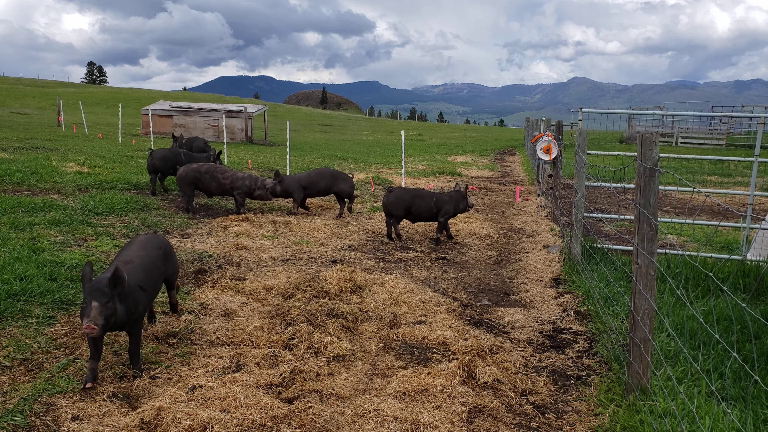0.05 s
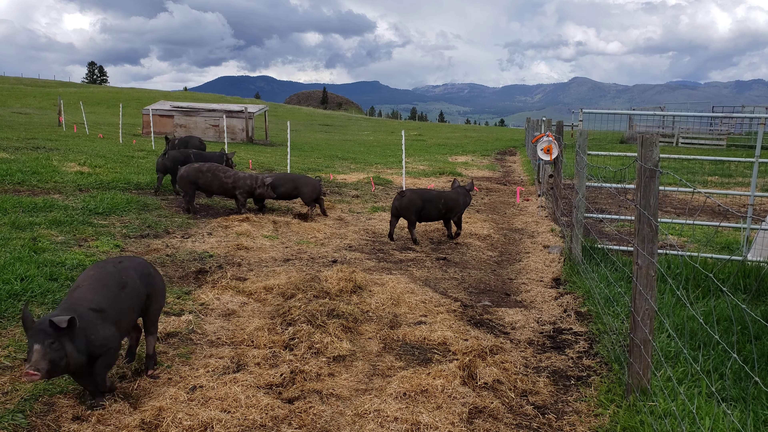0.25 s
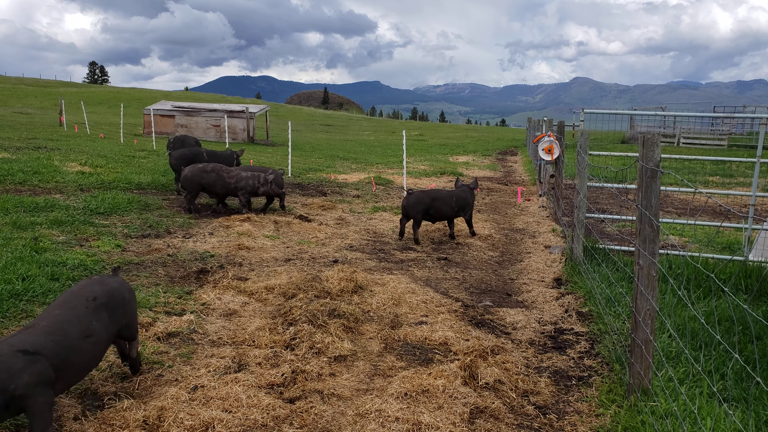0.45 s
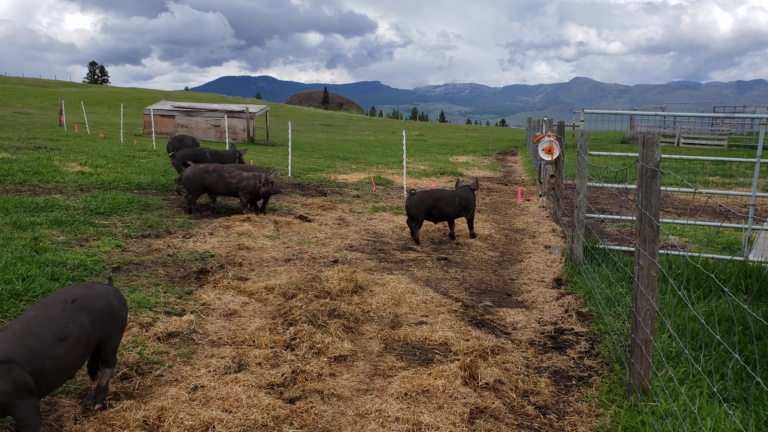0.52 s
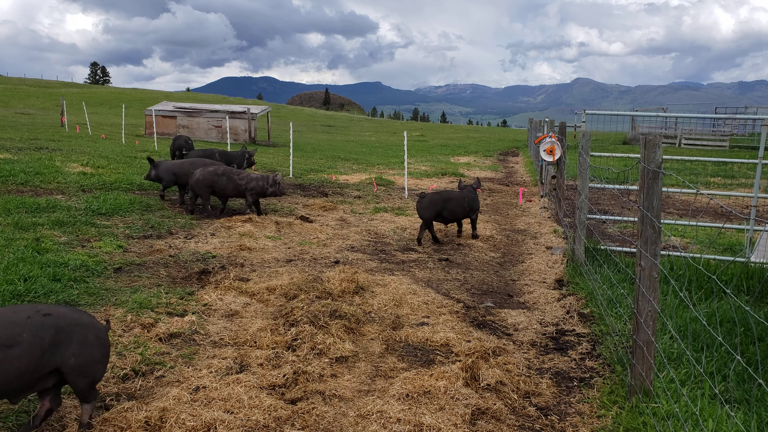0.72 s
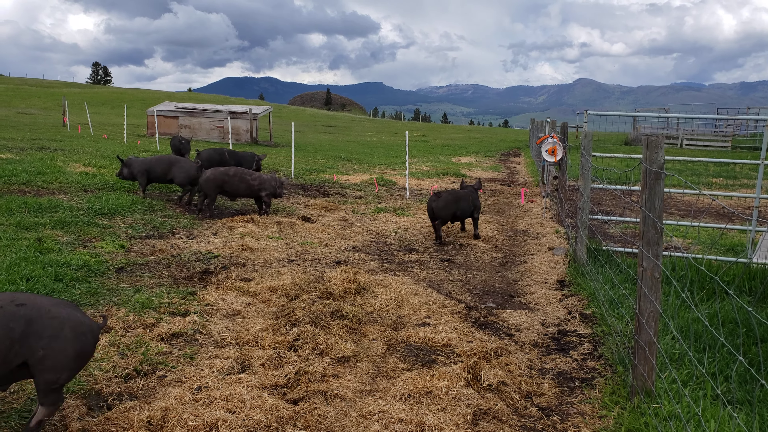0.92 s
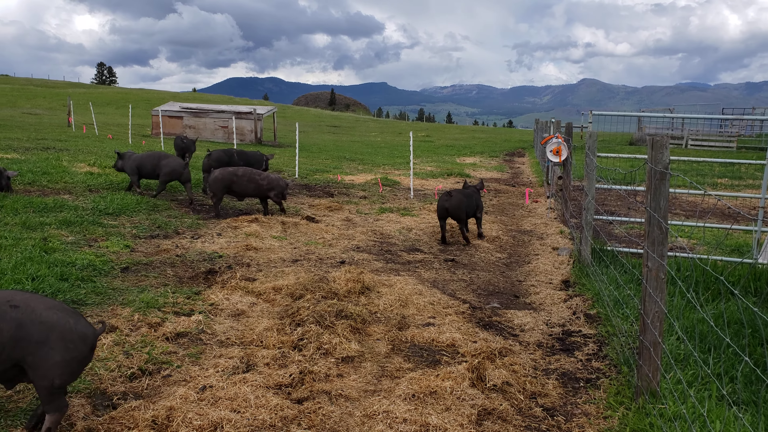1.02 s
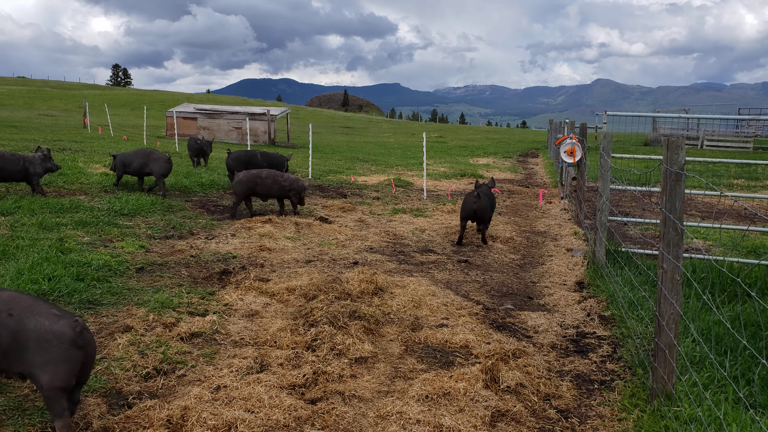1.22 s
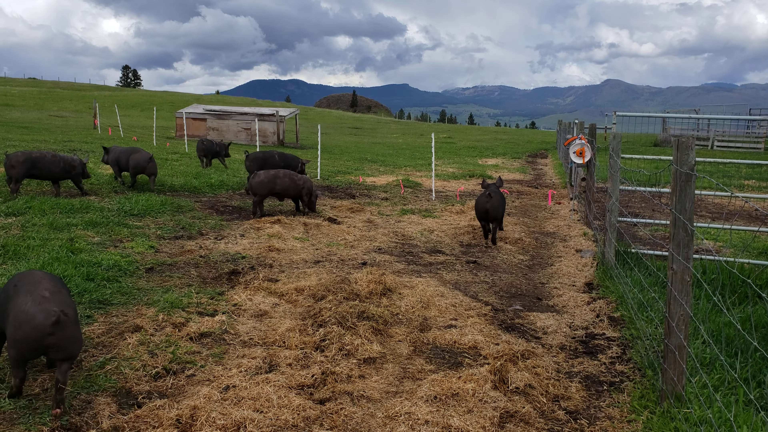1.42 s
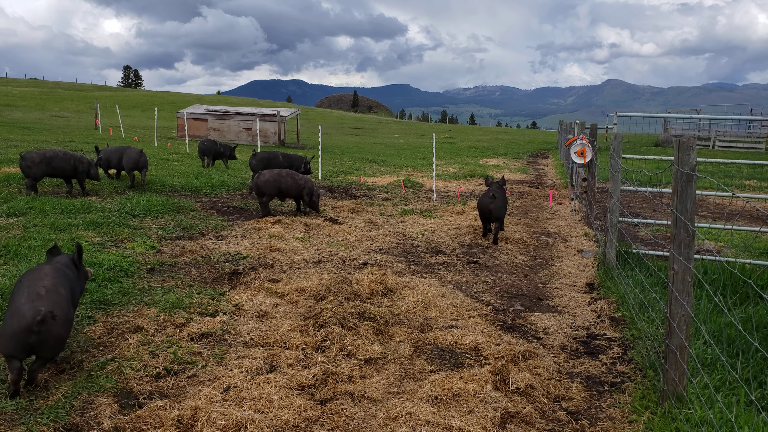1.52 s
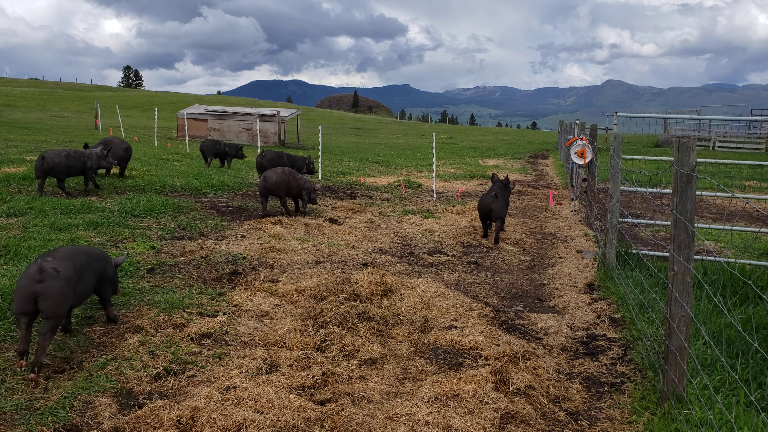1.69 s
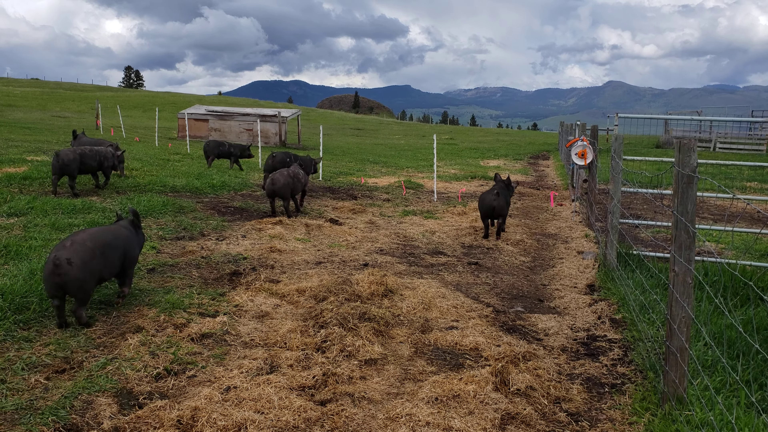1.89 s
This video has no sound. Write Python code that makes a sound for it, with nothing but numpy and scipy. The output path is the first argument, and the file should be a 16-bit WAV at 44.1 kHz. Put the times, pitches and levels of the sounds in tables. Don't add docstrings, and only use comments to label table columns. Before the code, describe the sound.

Wind rumble, in separate bursts left and right, dominates the first second outdoors; beneath it pigs brush quietly through dry straw, with small snaps, faint soil footfalls, a very distant engine hum and light hiss.

```python
import sys
import numpy as np
from scipy import signal
from scipy.fft import rfft, irfft, next_fast_len
from scipy.io import wavfile

SR = 44100
rng = np.random.default_rng(int(sys.argv[2]) if len(sys.argv) > 2 else 0)


def gain_from_db(level_db):
    decades = np.asarray(level_db, float) / 20
    return 10 ** decades


def persist_wave(psi):
    counts = np.round(np.clip(psi, -1, 1) * 32767).astype(np.int16)
    wavfile.write(sys.argv[1], SR, np.atleast_2d(counts).T)


N = 85995


def colour(x, points, lag_s=0):
    size = next_fast_len(N + 4096)
    hz = np.arange(size // 2 + 1) * SR / size + 1e-3
    corner_hz, corner_db = np.array(points).T
    gain = gain_from_db(np.interp(np.log(hz), np.log(corner_hz), corner_db))
    delay = np.exp(-2j * np.pi * hz * lag_s)
    return irfft(rfft(x, size) * gain * delay, size)[..., :N]


def rms_one(x):
    return x / np.sqrt(np.mean(x ** 2) + 1e-20)


def band(x, low_hz, high_hz):
    edges_hz = [low_hz, min(high_hz, 0.48 * SR)]
    return signal.sosfilt(signal.butter(2, edges_hz, "band", fs=SR, output="sos"), x)


def drift(rate):
    step = 40
    pole = np.exp(-2 * step * np.pi * rate / SR)
    noise = rng.standard_normal(N // step + 2002)
    slow = signal.lfilter([1], [1, -2 * pole, pole * pole], noise)[2000:]
    return np.interp(np.arange(N) / step, np.arange(len(slow)), rms_one(slow))


def bump(s, db, length, tail=0.66):
    t = np.arange(N) / SR - s
    width = length * np.where(t > 0, tail, 1)
    return gain_from_db(db) * 2.0 ** (-(2 * t / width) ** 2)


# time in seconds, rms level in dB, length in seconds, beat frequency in Hz.
LEFT_EDDIES = [(.03, -49.5, 0.037, 58.2), (.134, -51.5, 0.041, 62.5), (.267, -36, 0.029, 80.3),
               (.33, -34, 0.033, 89.7), (.36, -30.5, 0.025, 55.2), (.395, -40.5, 0.014, 75),
               (.4225, -21, 0.01, 161), (.411, -30, 0.02, 70), (.445, -18.5, 0.025, 61.5),
               (.4605, -26.5, 0.012, 78.4), (.4695, -32.5, 0.0075, 150), (.4825, -23, 0.0213, 60),
               (.55, -37, 0.061, 64.6), (.6, -45, 0.097, 55.1), (.745, -41, 0.029, 67.4),
               (.845, -32.5, 0.023, 57.5), (.89, -45, 0.16, 64.9), (.952, -35, 0.016, 57),
               (1.034, -49.5, 0.03, 67), (1.835, -38, 0.025, 62), (1.919, -51, 0.021, 109)]
RIGHT_EDDIES = [(.027, -35.5, 0.021, 74), (.106, -45, 0.066, 59.4), (.209, -26, 0.015, 72.3),
                (.26, -44, 0.14, 62.6), (.35, -53, 0.059, 57.5), (.45, -36, 0.047, 88),
                (.478, -29.5, 0.0195, 78), (.54, -49.5, 0.064, 55), (.635, -48, 0.078, 55),
                (.673, -31.5, 0.046, 88), (.739, -38.5, 0.041, 74), (.793, -37.5, 0.018, 61.4),
                (.868, -42, 0.012, 60), (1.022, -47, 0.046, 80), (1.07, -44.5, 0.055, 61.7),
                (1.69, -38, 0.025, 89.7), (1.702, -40.5, 0.0087, 115), (1.726, -42.5, 0.022, 75),
                (1.769, -41, 0.016, 70), (1.7815, -34.5, 0.014, 105), (1.803, -39, 0.012, 81),
                (1.814, -41.5, 0.012, 100), (1.826, -42.5, .012, 79), (1.886, -55.5, 0.12, 77.3)]
# frequency in Hz, gain in dB.
TURBULENCE = [(20, -34), (35, -9), (55, -2), (100, -8), (170, -19), (300, -30), (500, -43), (900, -69)]
EDDY_WOBBLE_RAD, EDDY_SHARPNESS = 1, 1.21
SHARP_REF_HZ, SHARP_BY_PITCH, SHARP_BY_LEVEL = 70, 0.36, 0.13
FIZZ_DB, FIZZ_DB_PER_OCTAVE = -9.5, 8.5
BREEZE_DB, BREEZE_LUMPS_DB, GUST_LUMPS_DB = -64, 8, 4


def wind(eddies):
    t, wobble = np.arange(N) / SR, drift(19.9)
    beats, fizz_power = 0, 0
    for s, db, length, hz in eddies:
        phase = 2 * np.pi * hz * (t - s) + EDDY_WOBBLE_RAD * (wobble - wobble[int(s * SR)])
        sharpness = EDDY_SHARPNESS * (hz / SHARP_REF_HZ) ** SHARP_BY_PITCH
        sharpness = sharpness * gain_from_db(SHARP_BY_LEVEL * (db + 32.5))
        shape = np.exp(sharpness * np.cos(phase))
        beats = beats - bump(s, db, length, tail=1.0) * (shape - shape.mean()) / shape.std()
        octaves = min(np.log2(hz / SHARP_REF_HZ), 0.4)
        fizz_db = db + FIZZ_DB + FIZZ_DB_PER_OCTAVE * octaves
        fizz_power = fizz_power + bump(s, fizz_db, 1.5 * length) ** 2
    rough = rms_one(colour(rng.standard_normal(N), TURBULENCE))
    lumps = np.minimum(drift(14.7), 1)
    gust_power = fizz_power * gain_from_db(GUST_LUMPS_DB * lumps) ** 2
    breeze_power = gain_from_db(BREEZE_DB + BREEZE_LUMPS_DB * lumps) ** 2
    thumps = colour(beats, [(22, -29.5), (52, 3.0), (260, -2), (900, -36.5)])
    return thumps + np.sqrt(gust_power + breeze_power) * rough


GRAINS_PER_S, GRAIN_SPREAD_DB = 9000, 1.5


def grains():
    spread_db = GRAIN_SPREAD_DB * np.minimum(rng.exponential(1, (2, N)), 5)
    sizes = gain_from_db(spread_db) * rng.standard_normal((2, N))
    chance = GRAINS_PER_S * gain_from_db(3 * drift(40)) / SR
    return rms_one(sizes * (rng.random((2, N)) < chance))


# time in seconds, rms level in dB, length in seconds, extra brightness in dB.
BRUSH = [(0.013, -56.5, 0.019, 8), (0.038, -66, 0.071, 9.5), (0.166, -62, 0.085, 3), (0.229, -66, 0.036, 6),
         (0.268, -67, 0.025, 11), (0.322, -59.5, 0.075, 2.5), (0.427, -60.5, 0.047, 7.5),
         (0.469, -61, 0.029, 3.5), (0.493, -66.5, 0.024, 12.5), (0.528, -62.5, 0.023, 6.5),
         (0.633, -65.5, 0.16, 4), (0.682, -65, 0.037, 5), (0.715, -65.5, 0.04, 7), (0.794, -71, 0.015, 6),
         (0.867, -78.5, 0.085, 13.5), (0.928, -70.5, 0.037, 13.5), (0.989, -64.5, 0.022, 5),
         (1.024, -65.5, 0.045, 5.5), (1.076, -70, 0.035, 11), (1.212, -65.5, 0.088, 10),
         (1.272, -65.5, 0.043, 13.5), (1.294, -64.5, 0.047, 0), (1.408, -77, 0.044, 13),
         (1.479, -66.5, 0.033, 11.5), (1.505, -55, 0.018, 10), (1.533, -57.5, 0.019, 5.5),
         (1.562, -58.5, 0.024, 4.5), (1.676, -65, 0.09, 8), (1.844, -62.5, 0.05, 4.5),
         (1.918, -62, 0.04, 2.5)]
# time in seconds, rms level in dB, length in seconds, centre frequency in Hz.
SCUFFS = [(0.016, -70, 0.028, 2800), (0.19, -70, 0.091, 1500), (0.27, -69.5, 0.19, 2700),
          (0.67, -72, 0.099, 1780), (0.661, -64.5, 0.13, 2640), (1.047, -73, 0.06, 2300),
          (1.272, -73, 0.079, 2760), (1.515, -71.5, 0.057, 2140), (0.32, -76.5, 0.068, 470),
          (0.493, -67.5, 0.0323, 430), (0.716, -68, 0.051, 335), (1.29, -68, 0.095, 144),
          (1.504, -76.5, 0.078, 425), (1.92, -63.5, 0.091, 250), (0.75, -60, 0.011, 3800),
          (0.0095, -73.5, 0.025, 530), (1.258, -78, .08, 460), (1.72, -76, 0.07, 380),
          (0.754, -81, 0.037, 390), (1.2, -73, 0.039, 810), (0.343, -76.5, 0.027, 450)]
STRAW_FLOOR_DB, BRIGHT_FLOOR_DB, FLUTTER_DB = -77, -67, 0.5


def straw():
    power = np.array([bump(s, db, length, tail=1.34) ** 2 for s, db, length, _ in BRUSH])
    brightness = gain_from_db(2 * np.array(BRUSH)[:, -1])
    body = np.sqrt(gain_from_db(STRAW_FLOOR_DB) ** 2 + power.sum(axis=0))
    edge = np.sqrt(gain_from_db(BRIGHT_FLOOR_DB) ** 2 + brightness @ power)
    rustle, flutter = grains(), gain_from_db(FLUTTER_DB * drift(40.4))
    out = body * flutter * rms_one(band(rustle, 3000, 10100)) * gain_from_db(5.0)
    out = out + edge * flutter * rms_one(band(rustle, 7980, 21000)) * gain_from_db(7)
    dull = grains()
    for s, db, length, hz in SCUFFS:
        source = dull if hz > 700 else dull[0]
        scuff = rms_one(band(source, hz / 1.385, hz * 1.267))
        out = out + bump(s, db + 7.5, length, tail=1.64) * scuff
    return out


# time in seconds, peak level in dB, centre frequency in Hz,
# band half-width as a frequency ratio, 60 dB decay time in seconds.
CRACKS = [(0.156, -48, 9100, 2.2, .005), (0.27, -52, 5340, 1.23, 0.0045), (0.3576, -42, 5360, 2.05, 0.0065),
          (0.393, -50.5, 5400, 1.4, 0.0057), (.421, -47, 12000, 1.8, .005),
          (0.5774, -46.5, 6230, 1.35, 0.014), (0.595, -47, 3240, 1.6, .018), (0.65, -42, 14000, 1.5, .004),
          (0.69, -55, 4400, 1.5, .014), (0.7145, -43, 14000, 1.1, 0.0044), (0.808, -51, 13500, 1.2, 0.0045),
          (0.986, -50.5, 5220, 1.38, 0.004), (1.159, -54, 8900, 2.1, 0.0055),
          (1.385, -59, 14000, 1.6, .004), (1.466, -50, 14500, 1.5, .004), (1.488, -48, 11000, 1.7, .004),
          (1.501, -36, 13300, 2.7, 0.0065), (1.503, -36, 13100, 3, 0.0076),
          (1.5117, -38, 11000, 2.8, 0.0044), (1.526, -48, 4000, 2, .004),
          (1.5372, -38.5, 12000, 4.4, 0.0054), (1.5589, -37, 12000, 2.2, 0.007),
          (1.586, -55, 12000, 1.2, .004), (1.599, -52, 11500, 1.3, .004), (1.634, -57, 13500, 1.7, 0.0044),
          (1.68, -49.5, 13500, 1.05, .005), (1.839, -50, 6000, 2.6, 0.0059), (1.9135, -54, 5000, 1.1, .006)]
SPLINTER_S = 0.0047


def cracks():
    out, t, noise = np.zeros(N), np.arange(N) / SR, rng.standard_normal(N)
    for s, db, hz, width, t60 in CRACKS:
        impulse = np.arange(N) == int(s * SR) + 1
        splinter = 0.4 * (t60 / SPLINTER_S) ** 2 * noise
        decay = (t >= s) * gain_from_db(-60 * np.abs(t - s) / t60)
        burst = (splinter + 2 * impulse) * decay + 1e-18
        ratio = max(width, 1.1)
        for _ in range(2):
            burst = band(burst, hz / ratio, hz * ratio)
        out += gain_from_db(db + 8.0) * burst / np.abs(burst).max()
    return out


# time
# in seconds, peak level in dB, ring frequency in Hz, 60 dB decay time in seconds.
TAPS = [(.183, -60.5, 1033, 0.051), (0.257, -64.5, 1354, 0.089), (.594, -52.5, 2607, 0.011),
        (.595, -53.5, 3090, 0.017), (0.596, -53.5, 1540, 0.018), (0.594, -57.5, 4300, 0.015),
        (0.649, -65, 1540, 0.015), (0.996, -63.5, 1870, 0.027), (1.059, -71, 1375, 0.069),
        (1.226, -61, 262, 0.052), (1.501, -59, 2030, 0.017), (1.79, -64, 577, 0.077),
        (1.81, -62, 2300, 0.016), (0.691, -43, 3870, 0.011), (1.62, -57.5, 5090, 0.0096)]
TAP_CONTACT_CYCLES = 1.76


def taps():
    out, t = np.zeros(N), np.arange(N) / SR
    for s, db, hz, t60 in TAPS:
        contact_s = TAP_CONTACT_CYCLES / hz
        contact = bump(s + contact_s / 2, 0, contact_s, tail=1)
        click = contact * np.cos(2 * np.pi * hz * t) * 2 / (contact_s * SR) + 1e-18
        r, w = gain_from_db(-60 / (t60 * SR)), 2 * np.pi * hz / SR
        ring = signal.lfilter([0, np.sin(w)], [1, -2 * r * np.cos(w), r * r], click)
        out += gain_from_db(db + 12) * band(ring, hz / 1.4, hz * 1.4)
    return out


# time in seconds, rms level in dB, length in seconds, ring frequency in Hz.
THUDS = [(1.165, -54.5, 0.032, 70), (1.207, -54.5, 0.061, 84.8), (1.243, -65, 0.025, 58),
         (1.297, -53, 0.027, 113), (1.351, -51, 0.056, 83.3), (1.425, -58, 0.059, 79.4),
         (1.47, -50, 0.052, 72.7), (1.517, -60.5, 0.036, 98), (1.614, -55, 0.037, 70),
         (1.5, -65, 0.017, 184), (1.565, -68.5, 0.035, 193), (1.916, -57, .012, 202),
         (1.946, -54, .015, 110)]


def thuds():
    t, out = np.arange(N) / SR, np.zeros(N)
    for s, db, length, hz in THUDS:
        out += bump(s, db + 2.5, length, tail=1.02) * np.sin(2 * np.pi * hz * (t - s))
    return out


ENGINE_HZ, ENGINE_WIDTH_HZ, ENGINE_DB = 79.5, 23.4, -62


def engine():
    r, w = np.exp(-np.pi * ENGINE_WIDTH_HZ / SR), 2 * np.pi * ENGINE_HZ / SR
    hum = rng.standard_normal(N + SR)
    for _ in range(2):
        hum = signal.lfilter([1, 0, -1], [1, -2 * r * np.cos(w), r * r], hum)
    return gain_from_db(ENGINE_DB) * rms_one(hum[SR:])


FIELD_DB = -67


def field():
    return gain_from_db(FIELD_DB) * gain_from_db(drift(1)) * rms_one(band(rng.standard_normal((2, N)), 190, 6000))


# frequency in Hz, gain in dB.
LEFT_PORT = [(300, -4.5), (1000, -5.5), (3000, -13), (5000, -5.5), (6900, 1), (8500, -14.5), (11000, -5),
             (15500, -1.5)]
RIGHT_PORT = [(300, -7), (2400, -11), (3000, -22.5), (6200, 4.5), (7800, -24), (9800, -47), (12500, -17),
              (15500, -47)]
RIGHT_LAG_S, DIFFUSE_SHARE = 0.000397, 0.8


def scene():
    direct, scattered = straw() + field()
    snaps = cracks() + taps()
    far_side = np.sqrt(1 - DIFFUSE_SHARE) * direct + np.sqrt(DIFFUSE_SHARE) * scattered
    left = colour(direct + snaps, LEFT_PORT) + wind(LEFT_EDDIES)
    right = colour(far_side + snaps, RIGHT_PORT, RIGHT_LAG_S) + wind(RIGHT_EDDIES)
    return np.array([left, right]) + engine() + thuds()


def band_limit(x):
    return signal.sosfilt(signal.butter(12, 16590, fs=SR, output="sos"), x)


PREAMP_HISS_DB, CUTOFF_HZ = -82, 15730


def record(dry):
    hiss = gain_from_db(PREAMP_HISS_DB) * rms_one(band(rng.standard_normal(dry.shape), 9100, 23000))
    top_cut = signal.ellip(12, 0.5, 75, CUTOFF_HZ, fs=SR, output="sos")
    mix = signal.sosfilt(top_cut, dry + hiss)
    return band_limit(mix)


dry = scene()
out = record(dry)
persist_wave(out)
```